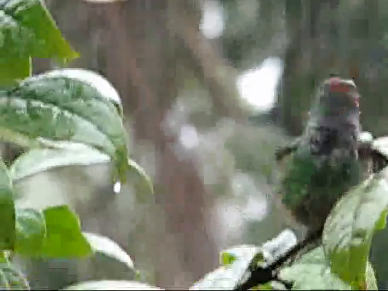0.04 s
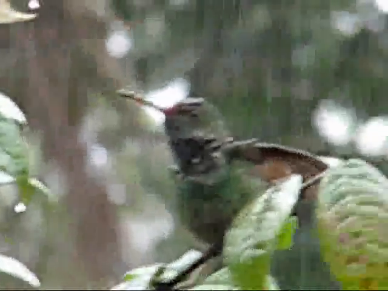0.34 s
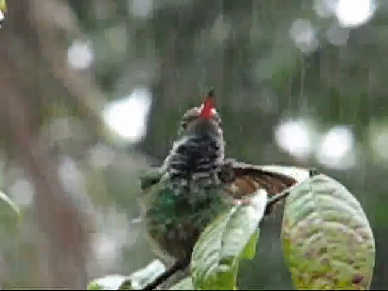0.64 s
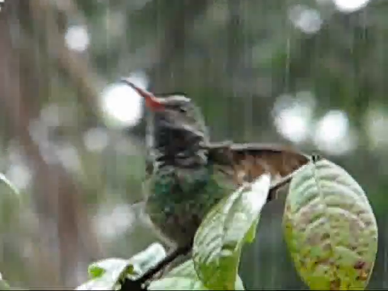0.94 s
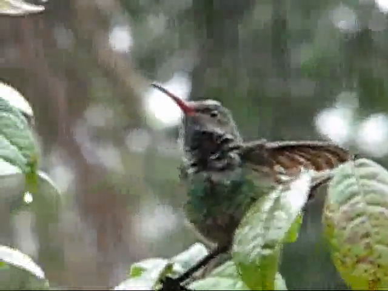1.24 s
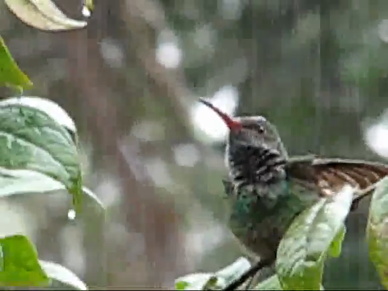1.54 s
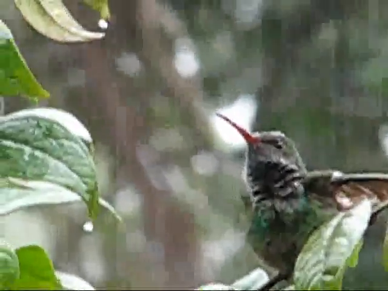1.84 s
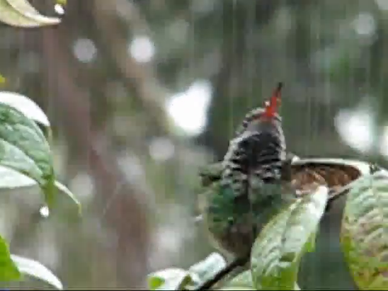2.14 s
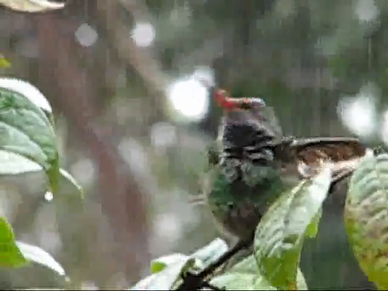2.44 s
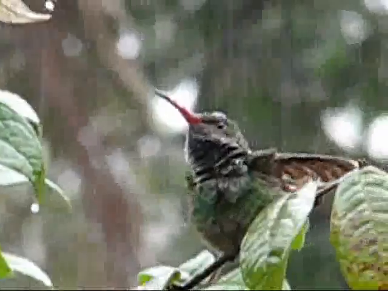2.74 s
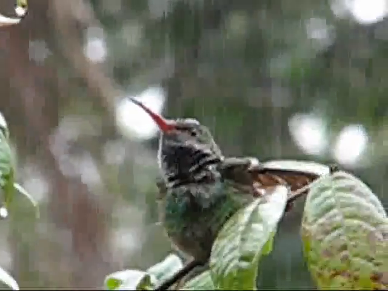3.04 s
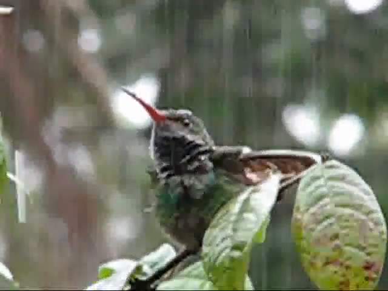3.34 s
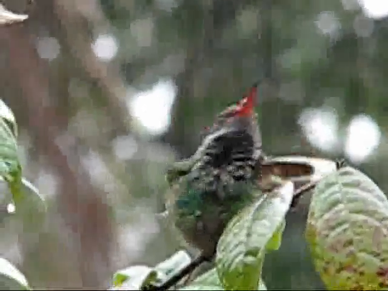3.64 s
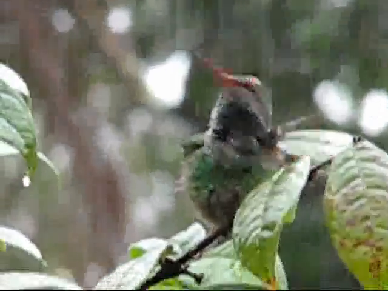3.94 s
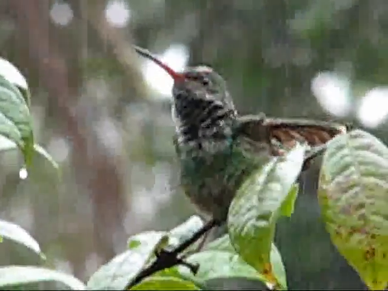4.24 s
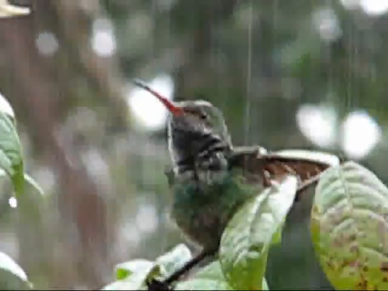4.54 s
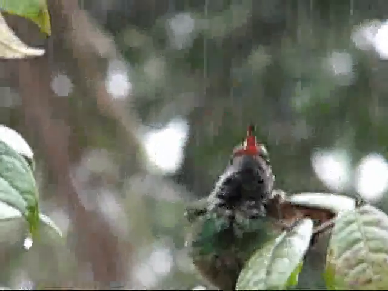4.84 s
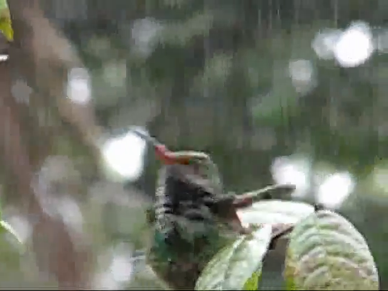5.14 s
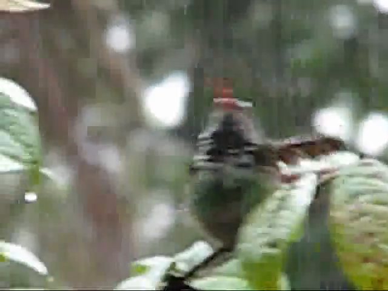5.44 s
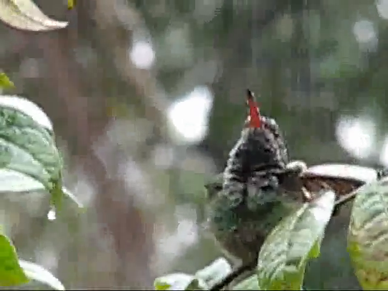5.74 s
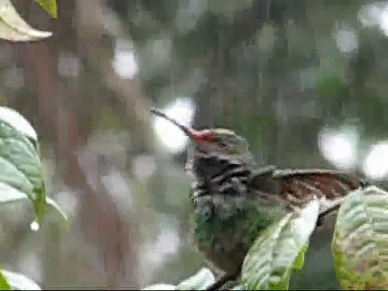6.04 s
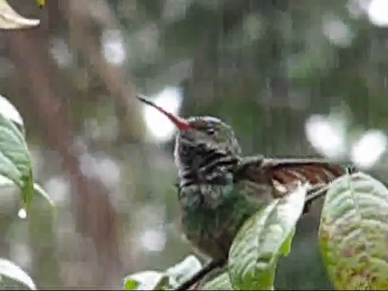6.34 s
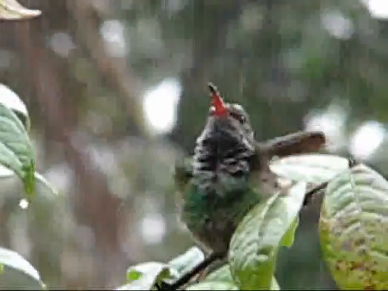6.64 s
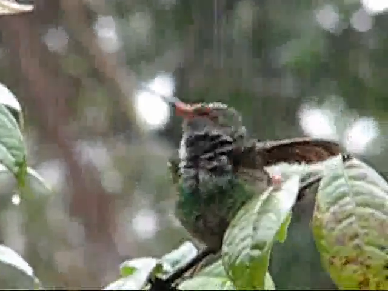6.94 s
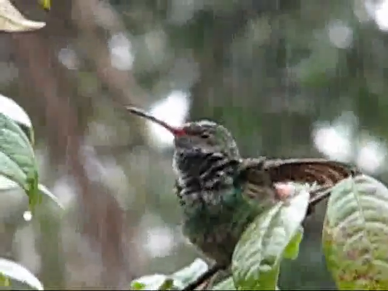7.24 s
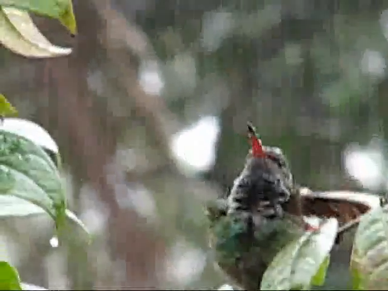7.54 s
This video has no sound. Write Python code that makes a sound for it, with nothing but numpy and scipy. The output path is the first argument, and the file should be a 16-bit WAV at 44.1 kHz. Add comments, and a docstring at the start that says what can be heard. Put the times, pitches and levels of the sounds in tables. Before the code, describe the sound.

Sharp, wet drips hit leaves and ground close by and slightly left, over the dense hiss and fine ticking of a downpour in a leafy garden. About three seconds in come several short, ringing metal scrapes farther away, and around five seconds something hollow is shifted and set down with a dull bump. The rain carries on throughout, its level ducking briefly whenever a loud drop lands near the microphone.

```python
"""A garden in heavy rain. The far downpour is an even wash, drops patter on the nearer foliage,
and fat drips splat on the leaves and ground close by, a little to the left.
Some way off a piece of metal is scraped and clanks a few times; later something lands with a dull bump.
An automatic volume control ducks under each loud splat and creeps back, so the rain seems to pulse."""
import sys
import numpy as np
from scipy import signal
from scipy.fft import irfft, next_fast_len
from scipy.io import wavfile

SR = 44100
rng = np.random.default_rng(int(sys.argv[2]) if len(sys.argv) > 2 else 0)


def pcm_store(signal):
    """Save signal as 16-bit PCM."""
    levels = np.round(np.clip(np.atleast_2d(signal), -1, 1) * 32767)
    wavfile.write(sys.argv[1], SR, levels.astype(np.int16).T)


N = 343098

# Levels in the tables are relative: the functions add their own gains.
# How alike the left and right sides are (1 is identical): pitch_hz, likeness
SIDE_LIKENESS = [(40, 0.99), (130, 1), (300, 0.99), (570, 0.96), (1000, 0.84), (1400, 0.63), (2200, 0.6),
                 (3200, 0.089), (5500, -0.11), (8000, -0.13), (11000, -0.19)]
# How much louder the left side is than the right: pitch_hz, difference_db
SIDE_BALANCE = [(300, 0.15), (1100, -0.5), (2200, -1), (3600, 1.2), (6400, 3.5), (8500, -0.5), (11000, -4)]
# Loudness of the far downpour: time_s, level_db
DOWNPOUR_LEVELS = [(0.0, -32.5), (0.41, -29.5), (0.97, -33), (3.51, -29.5), (3.64, -34.5), (4.94, -31.5),
                   (5.13, -28.5), (5.87, -34), (7.39, -32.5), (7.78, -30)]
# Tone of the far downpour: pitch_hz, level_db
DOWNPOUR_TONE = [(20, -32), (40, -16), (70, -5), (130, -1), (230, 1.5), (390, -0.5), (700, 2), (1200, 1.5),
                 (2400, 0), (3800, -4.5), (7500, -7.5), (11000, -31.5)]
# Loudness of the patter on the foliage: time_s, level_db
PATTER_LEVELS = [(0.0, -29.5), (0.71, -28), (1.08, -29.5), (3.79, -28), (3.96, -29), (5.29, -28),
                 (7.78, -28.5)]
# Tone of the patter: pitch_hz, level_db
PATTER_TONE = [(800, -10.5), (1800, -8.5), (3000, -7), (4500, -4.5), (6000, -3), (7600, 1), (9000, -6),
               (11000, -19)]
# Fat drips close by: start_s, crack_db, pitch_hz, spray_db, spray_decay_s
NEAR_DRIPS = [(0.004, -7, 6850, -17, 0.027), (0.099, -8.5, 7200, -23, 0.026),
              (0.172, -7.0, 7100.0, -30, 0.026), (0.47, -15, 8300, -11, 0.017),
              (0.536, -1.5, 2700.0, -21, 0.016), (0.583, -21, 7100, -13, 0.027),
              (0.692, -6.5, 3850, -28, 0.028), (0.768, -3.5, 5900, -21, 0.033),
              (0.895, -15, 7100, -22, 0.048), (0.926, -4, 5700, -31, 0.019),
              (1.073, -9.5, 4250, -30, 0.021), (1.119, -22, 5530, -9.5, 0.014),
              (1.379, -12, 5650, -20.5, 0.027), (1.552, -4.5, 5900.0, -23, 0.038),
              (1.59, -5.5, 2620, -23, 0.024), (1.789, -13, 6740, -20, 0.04),
              (1.841, -9.0, 7500, -11.5, 0.022), (1.947, -20, 6100, -13.5, 0.068),
              (2.204, -20, 6860, -19.0, 0.078), (2.271, -8.5, 6570, -20, 0.082),
              (2.337, -13.0, 6300, -15.0, 0.044), (2.499, -20, 6060, -15.0, 0.043),
              (2.55, -10, 6400, -11.5, 0.039), (2.832, -16, 7100.0, -18.5, 0.032),
              (2.955, -6.5, 7000.0, -16, 0.053), (3.13, -8, 6340, -17.0, 0.076),
              (3.181, -2, 6050, -24, 0.021), (3.558, -13, 6400.0, -19, 0.052),
              (3.688, -2.5, 7240, -22, 0.017), (3.757, -5, 7640, -14, 0.018),
              (4.304, -9, 6750, -18.5, 0.029), (4.58, -17, 5600, -18, 0.038),
              (4.701, -4, 7000, -11.5, 0.018), (4.788, -6.5, 5400, -18.5, 0.043),
              (5.04, -14, 5000.0, -20.5, 0.031), (5.318, -12.0, 7060, -19.0, 0.044),
              (5.358, -16, 6300, -14.0, 0.038), (5.507, -11.5, 7300, -33, 0.036),
              (5.713, -8, 7100, -26, 0.052), (5.797, -6.5, 3660, -28, 0.022),
              (5.848, -7.5, 7100, -24, 0.018), (5.97, -9.5, 5170, -14.5, 0.025),
              (6.041, -8.5, 3830, -23, 0.018), (6.139, -13, 3670, -21.5, 0.027),
              (6.323, -7, 5450, -18, 0.023), (6.374, -6.5, 6360, -25, 0.031),
              (6.436, -15.0, 6000.0, -19, 0.04), (6.567, -5.5, 7800, -16.5, 0.04),
              (6.712, -17, 2540, -16.0, 0.017), (6.824, -4.5, 6800.0, -18.5, 0.039),
              (7.156, -8, 6950, -12, 0.035), (7.209, -6, 5700, -17, 0.068),
              (7.361, -10.0, 7740, -11.5, 0.018), (7.463, -13, 6700, -19.5, 0.042),
              (7.688, -12, 6860, -18.0, 0.099)]
# Scrapes on the metal: start_s, length_s, grating_db, ring_db, low_boost_db, squeal_boost_db
SCRAPES = [(3.222, 0.064, -17.5, -25, -4, 10), (3.295, 0.017, -33, -25, -17, 8),
           (3.4, 0.046, -21, -41, -1, 0), (3.478, 0.034, -16, -36.5, 11.5, 11),
           (3.834, .054, -15, -26, 4.5, 4), (3.909, 0.017, -22.5, -38, -25, -6)]
# Tone of the grating: pitch_hz, level_db
GRATING_TONE = [(100, -14), (250, -11), (450, -15), (650, -4), (1300, -5), (2400, -4.5), (3250, 1),
                (4300, -9.5), (5450, 1), (7000, -21), (8000, -10), (11000, -39)]
# Notes the metal rings at: pitch_hz, level_db, tail_s (time to fall by 60 dB)
METAL_NOTES = [(735, 0, .24), (615, -7, .22), (1000, -7, .25), (1305, -3, .45), (1352, -3.5, .45),
               (1866, -4.5, .25), (3100, 0, .26), (5250, -8, .2), (5392, -3, .2), (8120, -10.5, .2)]
# A soft drag, then a dull bump: start_s, length_s, level_db
DRAG_AND_BUMP = [(4.882, 0.19, -30), (5.113, 0.04, -18.5)]
# Tone of the drag and bump: pitch_hz, level_db
BUMP_TONE = [(60, -27), (150, -25), (250, 5), (430, -0.5), (780, 5.5), (1000, 0), (1200, 5), (1800, -4),
             (2800, 4), (4300, -2), (9000, -21)]


def from_db(db):
    """Turns decibels into a factor to multiply by."""
    return np.exp(np.asarray(db) * np.log(10) / 20)


def unit_power(x):
    """Scales a signal to an average power of 1."""
    return x / np.sqrt(np.mean(x ** 2) + 1e-20)


def level_curve(rows):
    """Joins (time_s, level_db) points into a gain for every sample."""
    time_s, level_db = np.transpose(rows)
    return from_db(np.interp(np.arange(N) / SR, time_s, level_db))


def at_hz(rows, hz):
    """Reads between a table's rows, on a scale of octaves."""
    pitch_hz, values = np.transpose(rows)
    return np.interp(np.log(hz + 1), np.log(pitch_hz + 1e-20), values)


def add(out, start_s, sound):
    """Mixes a sound in at its start time."""
    at = max(round(start_s * SR), 0)
    out[:, at:at + sound.shape[1]] += sound[:, :N - at]


def drift(rate_hz, size):
    """A smooth random wobble, typically about 1 in size."""
    step, settle = 40, 2000
    r = np.exp(-2 * np.pi * rate_hz * step / SR)
    noise = rng.standard_normal(size // step + settle + 2)
    slow = signal.lfilter([1], [1, -2 * r, r * r], noise)[settle:]
    return np.interp(np.arange(size) / step, np.arange(len(slow)), unit_power(slow))


def surrounding_noise(tone, size):
    """Stereo noise from all around: alike on both sides in the bass, parting in the treble."""
    bins = next_fast_len(size, True) // 2 + 1
    hz, sides = np.linspace(0, SR / 2, bins), np.array([[1], [-1]])
    shared, opposed = rng.standard_normal((2, 2 * bins), dtype=np.float32).view(np.complex64)
    alike = np.clip(at_hz(SIDE_LIKENESS, hz), -.999, .999)
    spectrum = np.sqrt(1 + alike) * shared + np.sqrt(1 - alike) * opposed * sides
    gain = from_db(at_hz(tone, hz) + sides * at_hz(SIDE_BALANCE, hz) / 2)
    return unit_power(irfft(gain * spectrum)[:, :size])


def resonance(x, hz, width_hz):
    """Lets through a band around one pitch and weakens the rest."""
    r = np.exp(-np.pi * width_hz / SR)
    feedback = [1, -(1 + r * r) * np.cos(2 * np.pi * hz / SR), r * r]
    return signal.lfilter(np.array([1, 0, -1]) * (1 - r * r) / 2, feedback, x)


def fade(x, seconds):
    """Spreads every spike into a dying tail with the same total."""
    r = np.exp(-1 / (seconds * SR))
    return signal.lfilter([1 - r], [1, -r], x + 1e-18)


def impacts(per_s, spread_db):
    """Energy of drops landing at random, many small and few large; it averages 1."""
    at = np.flatnonzero(rng.random(N) < per_s / SR)
    energy = np.zeros(N)
    energy[at] = from_db(spread_db * np.minimum(rng.exponential(1, N)[at], 3)) ** 2
    return energy / energy.mean()


def swell(t, length_s, rise_s, tail_s):
    """Builds up, holds while the contact lasts, then falls by 60 dB in tail_s."""
    return np.clip(t / rise_s, 0, 1) * from_db(-60 * np.maximum(t - length_s, 0) / tail_s)


def downpour():
    """Far rain blends into an even wash of noise."""
    return level_curve(DOWNPOUR_LEVELS) * surrounding_noise(DOWNPOUR_TONE, N)


def patter(tick_s=0.001, scatter_share=0.56, scatter_s=0.02):
    """Drops tick and the leaves around scatter the sound; small drops tick high, big ones broad."""
    def ticks(energy):
        return np.sqrt((1 - scatter_share) * fade(energy, tick_s)
                       + scatter_share * fade(energy, scatter_s))

    noise = surrounding_noise(PATTER_TONE, N)
    high = resonance(noise, hz=7300, width_hz=2200)
    big = impacts(per_s=550, spread_db=6.5)
    small = impacts(per_s=390, spread_db=16)
    return level_curve(PATTER_LEVELS) * (high * ticks((big + small) / 2) + (noise - high) * ticks(big))


def drips(tick_s=0.00019, gap_s=0.0032, spray_rise_s=0.0059, direct_share=0.27, droplets=8):
    """A drip touches, cracks and echoes off something near, then throws droplets and fine spray."""
    size, lead = SR // 5, 3  # in samples
    out, t = np.zeros((2, N)), np.arange(size) / SR
    # the spray is a shower of tiny ticks
    shower = fade(impacts(per_s=2600, spread_db=3), 0.00036)
    for start_s, crack_db, pitch_hz, spray_db, decay_s in NEAR_DRIPS:
        # the hits in order: touch, crack, echo, then the droplets
        hit_s = np.r_[gap_s * np.arange(3), 2 * gap_s + decay_s * rng.uniform(0, 1.5, droplets)]
        hit_db = crack_db + np.r_[-4, 3, 1, 3 * rng.standard_normal(droplets)]
        hit_gain = from_db(hit_db) * np.exp(-hit_s / (2 * decay_s))
        hits = np.bincount((hit_s * SR).astype(int), hit_gain ** 2, size)[:size]
        spray = from_db(spray_db + 0.8) * np.minimum(t / spray_rise_s, 1) * np.exp(-(t - gap_s) / decay_s)
        spray_energy = spray ** 2 * np.roll(shower, -int(start_s * SR))[:size]
        # direct sound reaches the left first; what the leaves scatter differs between the sides
        noise = rng.standard_normal((3, size + lead))
        direct, scattered = np.array([noise[2, lead:], noise[2, :size]]), noise[:2, :size]
        splat = np.sqrt(direct_share) * direct + np.sqrt(1 - direct_share) * scattered
        splat *= np.sqrt(fade(hits, tick_s) * tick_s * SR + spray_energy)
        # the leaf rings broadly around its pitch and gives off little below it
        width_hz = low_cut_hz = 0.37 * pitch_hz
        leaf = resonance(splat, pitch_hz, width_hz) * np.sqrt(SR / (np.pi * width_hz))
        add(out, start_s - gap_s, signal.lfilter(*signal.butter(2, low_cut_hz, "high", fs=SR), leaf))
    softened = signal.lfilter(*signal.butter(2, 9000, fs=SR), out)
    return softened * from_db([[1], [-1]])  # a little to the left


def scraped_metal(blur_hz=20, flicker_db=2.5, rise_s=0.021):
    """Scrapes grate and set the metal ringing; garden echoes blur each note in pitch and level."""
    size = 65536
    t = SCRAPES[0][0] + np.arange(size) / SR
    grating = sum(from_db(grating_db) * swell(t - start_s, length_s, rise_s, tail_s=0.23)
                  for start_s, length_s, grating_db, *_ in SCRAPES)
    out = grating * surrounding_noise(GRATING_TONE, size)
    for pitch_hz, note_db, tail_s in METAL_NOTES:
        # where the metal is touched decides how much the low notes and the squeal get
        is_low, is_squeal = pitch_hz < 850, 2500 < pitch_hz < 4000
        ring = sum(from_db(ring_db + is_low * low_db + is_squeal * squeal_db)
                   * swell(t - start_s, length_s, rise_s, tail_s)
                   for start_s, length_s, _, ring_db, low_db, squeal_db in SCRAPES)
        left_phase = 2 * np.pi * np.cumsum(pitch_hz + blur_hz * drift(63, size)) / SR
        right_phase = left_phase + 0.45 * drift(27, size)
        note = np.sqrt(2) * np.sin([left_phase, right_phase])
        out += ring * from_db(note_db + flicker_db * drift(100, size)) * note
    return out * from_db([[-0.5], [0.5]])  # slightly to the right


def bump():
    """Something a bit hollow is shifted and set down far off; the garden smears it into a soft burst."""
    t = DRAG_AND_BUMP[0][0] + np.arange(SR) / SR
    loudness = sum(from_db(level_db) * swell(t - start_s, length_s, rise_s=0.018, tail_s=0.47)
                   for start_s, length_s, level_db in DRAG_AND_BUMP)
    burst = loudness * surrounding_noise(BUMP_TONE, SR)
    hollow_ring = resonance(burst, hz=765, width_hz=70)
    return burst + from_db(-2) * hollow_ring


def volume_control(x, threshold_db=-19.5, cut_share=0.84, recover_db_per_s=14):
    """The treble of a loud splat pushes the volume down at once; then it creeps back up."""
    treble = signal.sosfilt(signal.butter(2, 4000, "high", fs=SR, output="sos"), x)
    treble_db = 10 * np.log10(fade(np.mean(treble ** 2, axis=0), seconds=0.008) + 1e-12)
    cut_db = cut_share * np.maximum(treble_db - threshold_db, 0)
    recovery_db = recover_db_per_s * np.arange(N) / SR
    held_cut_db = np.maximum.accumulate(cut_db + recovery_db) - recovery_db
    return x * from_db(-fade(held_cut_db, seconds=0.0015))


def scene(rain_db=4):
    """Rain at three distances, with the scraped metal and the bump behind it."""
    out = from_db(rain_db) * (downpour() + patter()) + drips()
    add(out, SCRAPES[0][0], scraped_metal())
    add(out, DRAG_AND_BUMP[0][0], bump())
    return out


def record(dry, low_cut_hz=39, clip_level=0.82, top_cut_hz=11000):
    """The deepest bass is lost, loud sounds duck the volume, peaks clip and the top is cut steeply."""
    trimmed = signal.sosfilt(signal.butter(2, low_cut_hz, "high", fs=SR, output="sos"), dry)
    clipped = np.clip(volume_control(trimmed), -clip_level, clip_level)
    return signal.sosfilt(signal.ellip(10, .3, 75, top_cut_hz, fs=SR, output="sos"), clipped)


dry = scene()
out = record(dry)
pcm_store(out)
```